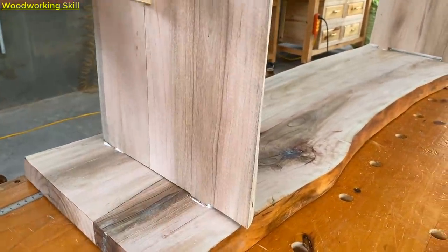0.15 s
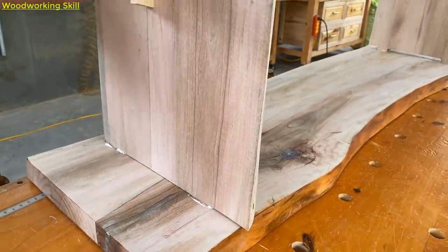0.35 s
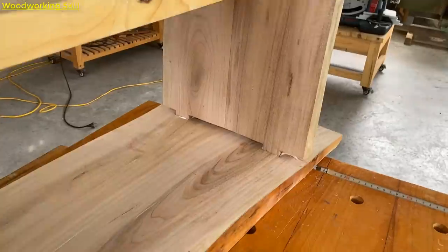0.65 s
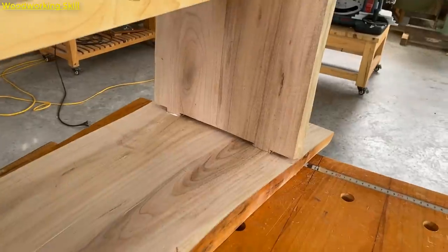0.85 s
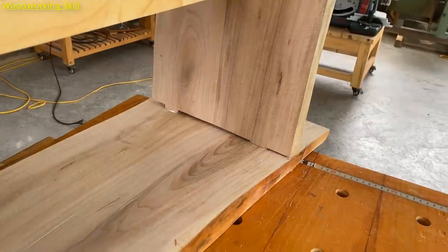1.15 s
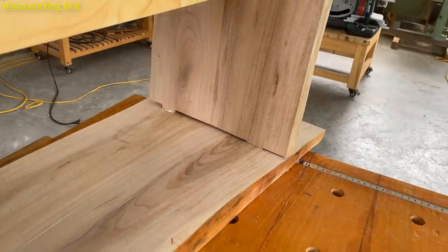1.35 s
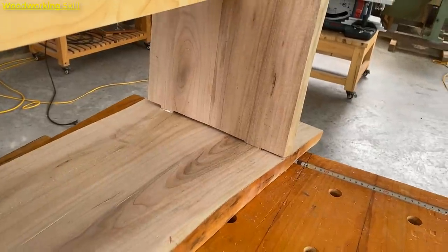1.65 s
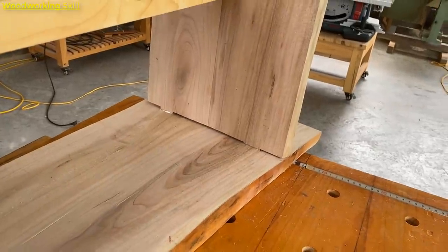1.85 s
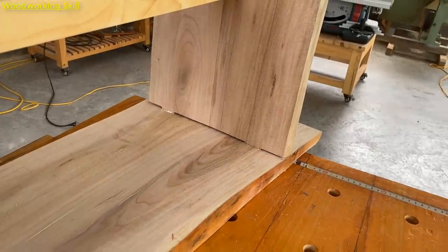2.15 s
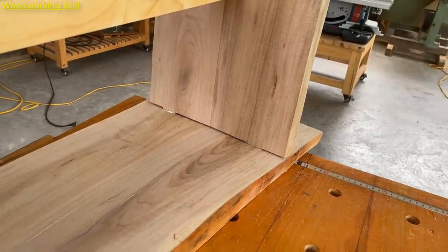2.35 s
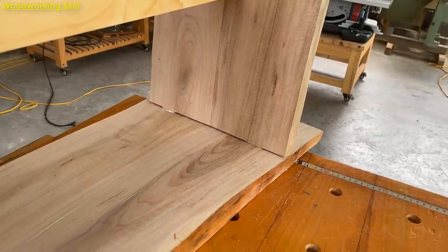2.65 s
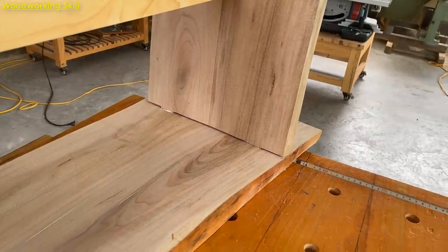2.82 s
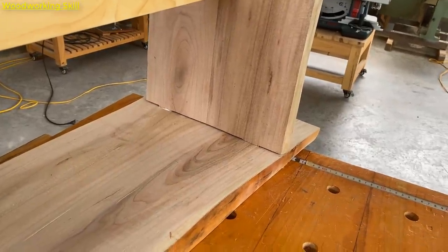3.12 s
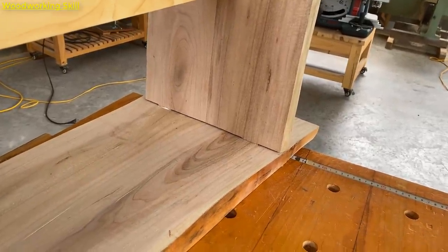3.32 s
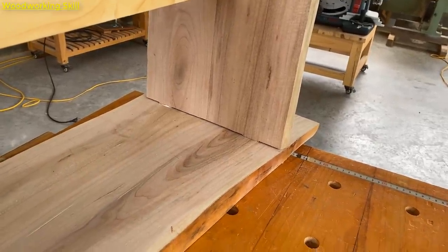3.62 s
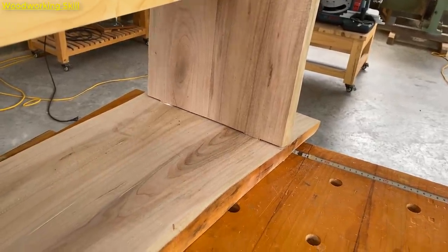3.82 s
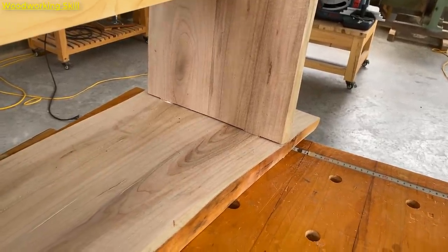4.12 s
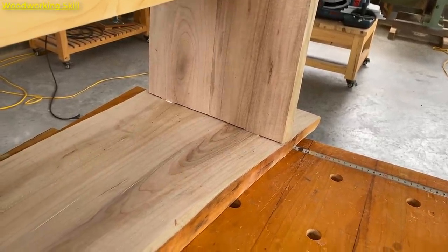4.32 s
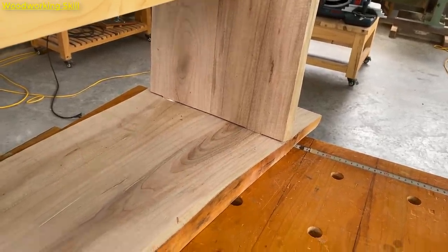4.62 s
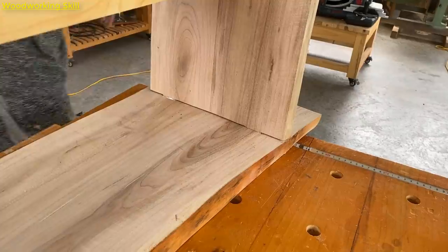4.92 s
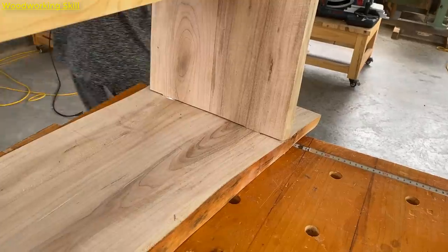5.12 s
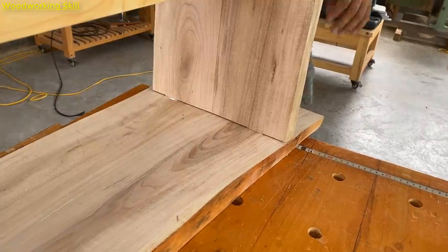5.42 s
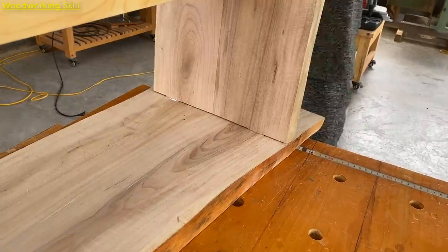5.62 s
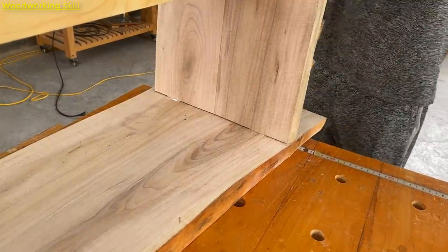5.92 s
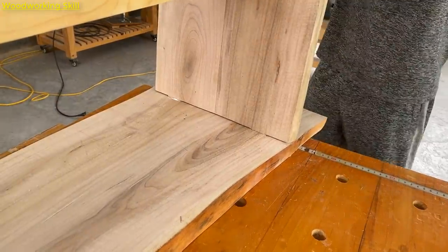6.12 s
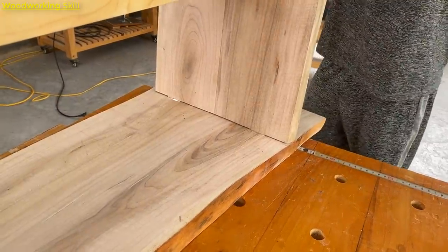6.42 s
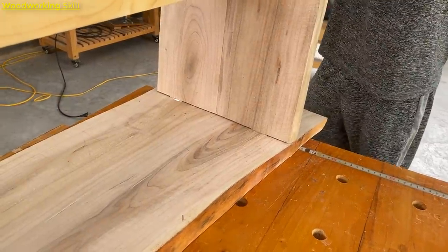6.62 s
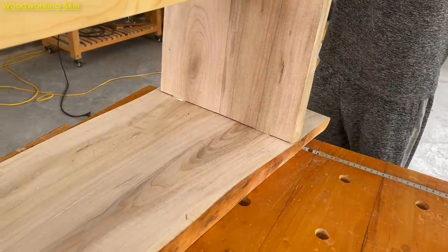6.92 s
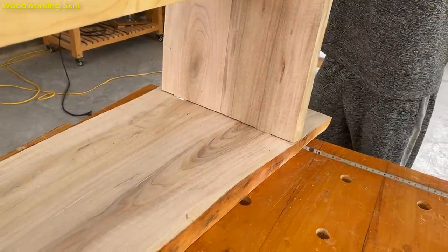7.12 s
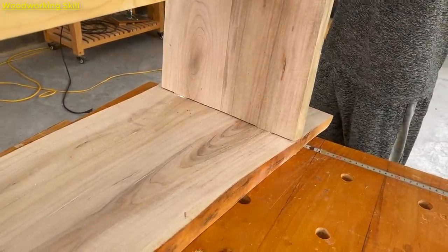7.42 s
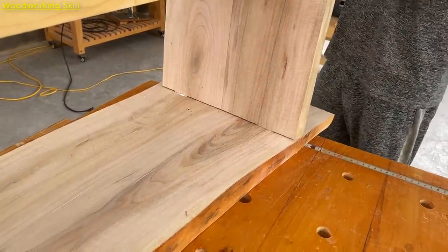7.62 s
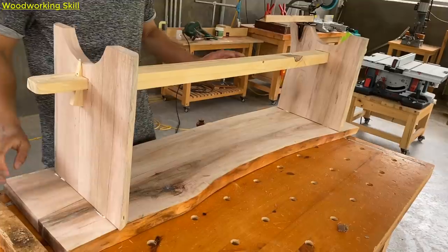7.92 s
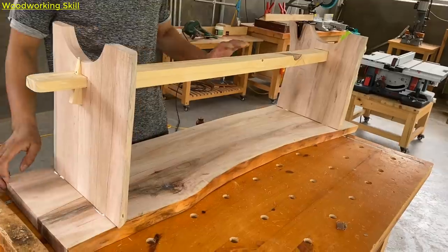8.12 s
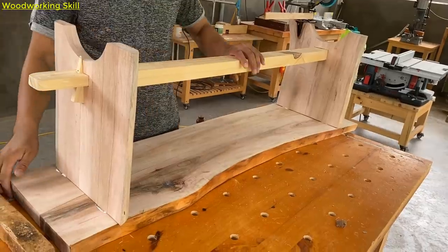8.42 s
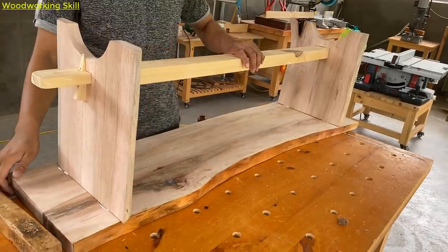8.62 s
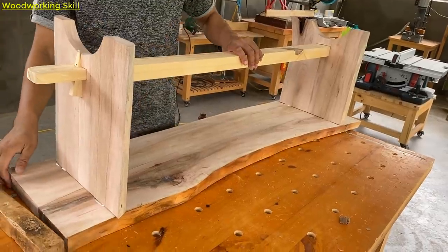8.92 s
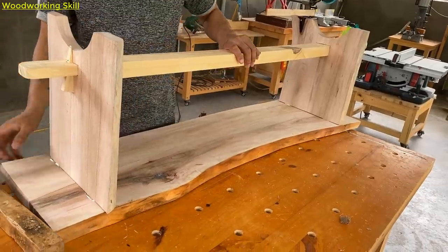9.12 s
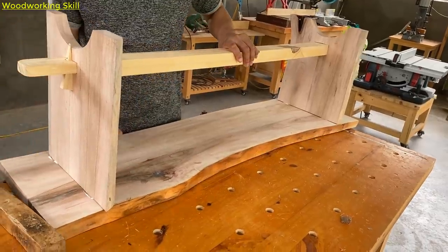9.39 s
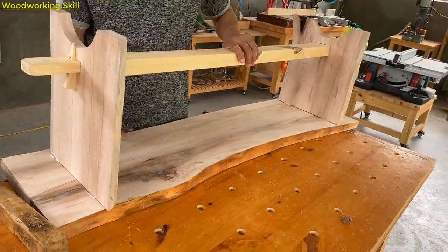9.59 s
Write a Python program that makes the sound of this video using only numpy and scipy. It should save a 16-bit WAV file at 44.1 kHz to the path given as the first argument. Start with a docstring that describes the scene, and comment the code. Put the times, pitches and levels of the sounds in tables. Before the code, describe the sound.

Sharp hammer strikes on thick wooden planks, about four a second, ring briefly in a hard room, pause, resume louder, then stop abruptly.

```python
"""Hammering wooden joints home

A steel hammer strikes wood in runs of quick blows in a bare workshop, close to a stereo microphone.
Each blow is a filtered noise crack plus decaying modes of wood and steel, sent through a noise-built room.
Faint bumps, swishes and room hum lie beneath; a limiter ducks the hard blows and recovers.
Sound drops out twice; after the second gap only a second hum and a few faint bumps are left."""
import sys
import numpy as np
from scipy import signal
from scipy.io import wavfile
from scipy.ndimage import uniform_filter1d, minimum_filter1d

SR = 44100
rng = np.random.default_rng(int(sys.argv[2]) if len(sys.argv) > 2 else 0)


def wav_record(signal):
    """Record a signal, one row per channel, as 16-bit PCM in the file named by sys.argv[1]."""
    frames = np.transpose(np.atleast_2d(signal))
    bounded = np.clip(frames, -1, 1)
    # unit amplitude maps onto the largest positive 16-bit level
    quanta = np.round(bounded * 32767).astype(np.int16)
    wavfile.write(sys.argv[1], SR, quanta)


N = 429973
LEAD_S = .2  # the mix starts this early, for a blow already ringing at t = 0
BLOW_LEN = 12288  # samples, also for bumps

# hammer blows: t/s, strength/dB, then relative to strength: thud/dB (plank and bench), panel ring/dB,
# crack/dB, hammer head ring/dB
BLOWS = [(-0.09, -18, -25, 3, 7.5, 1), (0.093, -15.5, -1.5, 1.5, 8.5, -2),
         (0.3483, -23.5, -10, 5, 13.5, 16.5), (0.6601, -26.5, -5.5, -5, -9.5, -10),
         (0.9, -16, -7.5, 8.5, 10, 6.5), (1.1208, -14.5, -5, 4, 4, -8.5), (1.3422, -14.5, -2, 5, 3.5, -4.5),
         (1.691, -14, -9.5, 0, 1, -8), (1.9214, -15, -3, 7, 7.5, 1), (2.1515, -16.5, -2.5, 6.5, 5.5, -1.5),
         (2.3582, -14.5, 0.5, 5, 2.5, 2.5), (2.5703, -15, -5.5, 6.7, 0.5, -8),
         (2.9328, -33.5, 0.5, 2.5, -6, -7.5), (3.1544, -14, -7, 3.5, 1.3, -2.5),
         (3.392, -13.5, -7.5, 3, 0.5, -0.5), (3.6227, -14.5, -5, 1, 1.6, 1.2),
         (3.984, -32.5, -7.5, -3, -11.5, -7), (4.2329, -15.5, -5, 8, 8, 6.5), (4.4414, -18, -6, 0.6, 11, 4),
         (5.9078, -28.5, -9, -4, -28.5, -13.5), (6.1423, -12.5, -6, -3, 6, -6.5),
         (6.349, -9.5, -8, -0.5, 3, 4), (6.5555, -14, -8.5, 3.6, -4, -19.5),
         (6.7575, -14.5, -10.5, 1, -1.3, -9), (7.01, -23, -13.5, 9, -5, -9.5),
         (7.2378, -15, -6.5, -1, 6.5, -1.5), (7.4695, -17, -8.5, 4.5, 4, -5),
         (7.7955, -27, -17, 6, -12, -8)]
# modes of bench, board, plank, panel and hammer head: f/Hz, level/dB, t60/s
BENCH_MODES = [(101, -21, 0.3), (135, -14.5, .03), (165, -7, 0.011)]
BOARD_MODES = [(357, -3.5, 0.0097), (421, -3, 0.075), (422, 6, .033), (533.6, 1.5, 0.035),
               (635, 0.5, 0.017), (718, 0, 0.015), (822, 7, 0.012), (890, 1.5, 0.016), (936, 7.5, 0.033),
               (1134, 4, 0.0087), (1126, 1, 0.011), (1249, -4.5, 0.014), (1271.4, 3.5, 0.044),
               (1429, -1, 0.036)]
PLANK_MODES = [(198, -9.5, .34), (215, -4, .04), (224, -11, .17), (258, -6, .09), (284, -6.5, .15)]
PANEL_MODES = [(1696, -7, 0.0054), (1952, 5.5, 0.034), (2124, -1, 0.038), (2261, -2.5, 0.0047)]
HEAD_MODES = [(4676, -10.5, 0.025), (4202, -13.5, 0.016), (4325, -3, 0.045), (4735, -13.5, 0.037),
              (4880, -12.5, 0.011)]
# crack spectrum: f/Hz, level/dB
CRACK_COLOUR = [(1500, -27.5), (2600, -1.5), (3200, 4), (3800, 1), (4400, -7.5), (5300, -3), (6900, -8),
                (7600, -3.5), (9000, -11.5), (12000, -16), (16000, -24)]
# soft bumps and rings, some of them a blow's lingering boom or rebound: t/s, level/dB, f/Hz, t60/s
BUMPS = [(.005, -41.5, 506, 0.13), (0.095, -10, 135, 0.076), (0.121, -22.5, 94, .2),
         (.125, -44.5, 506, 0.2493), (.252, -35, 504, .025), (0.255, -33, 195, .05),
         (0.418, -35.5, 116, 0.086), (0.469, -55.5, 107, 0.29), (2.80, -43, 177, 0.076),
         (2.845, -43, 111, 0.19), (2.881, -44, 107.6, .07), (5.618, -44, 150, 0.032),
         (5.689, -53.5, 109, .1), (5.722, -52.5, 171, 0.057), (5.80, -56.5, 107, 0.122),
         (5.881, -45, 168, .05), (6.05, -49.5, 148.4, 0.044), (6.482, -33, 481, .03),
         (6.486, -35.5, 229, .05), (7.982, -69.5, 4900, 0.065), (8.09, -57.5, 1175, 0.28),
         (9.527, -39, 815, 0.035), (9.527, -47.5, 150, 0.4)]
# faint swishes falling in pitch: t/s, length/s, level/dB, start f/Hz, end f/Hz
SWISHES = [(4.727, 0.025, -78, 9000, 6000), (5.421, 0.036, -74, 10000, 8000),
           (5.803, 0.069, -68.5, 9800, 7000)]
# room tail decay: f/Hz, t60/s
ROOM_T60 = [(90, 0.47), (170, 0.16), (260, 0.44), (700, 0.32), (1840, 0.36), (4850, 0.35), (12800, 0.29)]
# room tail spectrum: f/Hz, level/dB
ROOM_COLOUR = [(150, -9), (270, -2.5), (420, -12), (800, -3.5), (1300, -3), (1680, -5.8), (1950, -1),
               (2700, -3.5), (3600, -2.5), (4450, -1), (6000, -11.5), (9000, -7), (16000, 3.5)]
# room tail left-right likeness: f/Hz, correlation (-1..1)
ROOM_ALIKE = [(200, 1), (500, .85), (1000, 0.65), (2400, 0.48), (15000, .05)]
# early echoes from bench, floor and walls: delay/s, level/dB
ECHOES = [(.0035, -13), (.006, -21), (.009, -17), (0.012, -23.5), (0.023, -25), (0.033, -29)]
# hum spectra at the bench and at the second spot: f/Hz, relative level/dB
HUM_COLOUR = [(15, -64), (25, -40.5), (114, -15.5), (259, -9), (368, -6.5), (399, -11.5), (1010, -11.5),
              (1390, -6), (1640, -12), (2040, -9.5), (4240, -19.5), (6210, -25.5), (12200, -32.5),
              (16500, -48.5)]
HUM_AFTER_COLOUR = [(15, -43), (25, 0), (48, -9.5), (192, -5), (304, -6), (399, -4.5), (766, -4.5),
                    (1360, -11.5), (1680, -12), (2750, -18), (3410, -26.5), (6550, -32), (7710, -37.5),
                    (16500, -45)]
# hum left-right likeness at either spot: f/Hz, correlation (-1..1)
HUM_ALIKE = [(60, 0.78), (180, 0.886), (550, 0.35), (1650, -0.76), (4970, -0.62), (15000, -0.69)]
HUM_AFTER_ALIKE = [(60, 0.94), (180, 0.86), (550, 0.13), (1650, -0.16), (4970, 0.15), (15000, -0.036)]
# silences: from t/s, to t/s
GAPS = [(.614, .636), (7.914, 7.960)]

RIGHT_LAG_S, STEEL_LAG_S = .00009, .00018  # right channel delay: wood, crack and hammer head
BODY_LEAN_DB, PANEL_LEAN_DB, STEEL_LEAN_DB = -2.16, 2, 2  # left over right
CRACK_DB, CRACK_T60_S, CRACK_RISE_S = 10.5, .0059, .00067
BOOM_DB, BOOM_DB_PER_THUD_DB = -1, .8  # the bench booms in step with the plank's thud
RING_TO_ROOM_DB = -3.5  # board, panel and head ringing reach the room weaker than the microphone
KNOCK_DB, KNOCK_LOW_HZ, KNOCK_HIGH_HZ = 39, 420, 2590
KNOCK_DB_PER_CRACK_DB = .3  # sharper blows throw out more knock
ROOM_TAIL_DB, ROOM_BUILD_S = -7, .016
LOW_CUT_HZ, EDGE_HZ = 88, 16600  # microphone low cut, output lowpass
HUM_DB, HUM_AFTER_DB, HUM_SWELL_DB_PER_S = -59, -57, 1.27
LIMIT_DB, HOLD_S, DUCK_LAG_S = -4.7, .062, .0013
QUICK_RELEASE_DB_PER_S, SLOW_RELEASE_DB_PER_S = 260, 35


def gain_of(db):
    """Decibels to a factor."""
    return 10 ** (np.asarray(db) / 20)


def evened(x):
    """Scales to rms 1."""
    return x / np.sqrt(np.mean(x ** 2) + 1e-20)


def read(points, hz):
    """Reads a spectrum table on a log-frequency axis."""
    f, value = np.transpose(points)
    return np.interp(np.log(hz + 1), np.log(f + 1), value)


def add(mix, s, sound):
    """Mixes a sound in at time s, cut at the end of the mix."""
    part = mix[..., round((s + LEAD_S) * SR):][..., :sound.shape[-1]]
    part += sound[..., :part.shape[-1]]


def lean(db):
    """Left and right gains for a left-over-right level."""
    return gain_of(db * np.array([[.5], [-.5]]))


def pair(frames, size, alike):
    """Random short-time spectra for two channels, correlated per frequency as the table says."""
    hz = np.fft.rfftfreq(size, 1 / SR)
    a, b, c, d = rng.standard_normal((frames, len(hz), 4)).T
    left, other = a + 1j * b, c + 1j * d
    same = np.clip(read(alike, hz), -1, 1)[:, None]
    return hz, np.array([left, same * left + np.sqrt(1 - same ** 2) * other])


def ring(modes, t, travel=0.05182, spread_db=2.5, detune=0.0033, scatter=0.41, front_db=9.0, front_s=0.0026):
    """Dying modes; bending waves carry treble faster, so a mode arrives travel / sqrt(Hz) seconds late."""
    hz, db, t60 = np.transpose(modes)[:, :, None, None]
    chance = rng.standard_normal((3, len(modes), 1, 1))  # level, pitch, phase
    since = np.maximum(t - travel / np.sqrt(hz), 0)
    rise = 1 - np.exp(-since * hz * 2.02)
    # the first wave front is louder than the ringing left once it has spread through the wood
    front = front_db * (np.exp(-(since / front_s) ** 2) - .5)
    level = gain_of(db + front + spread_db * chance[0] - 60 * since / t60) * rise
    phase = 2 * np.pi * hz * (1 + detune * chance[1]) * since + scatter * chance[2]
    return (level * np.sin(phase)).sum(0)


def crack(since):
    """Steel on wood: coloured noise, partly common to both channels, with a fast and a faint slow decay."""
    lag, margin = round(STEEL_LAG_S * SR), 32
    noise = rng.standard_normal((3, BLOW_LEN + margin))
    shared = np.array([noise[2, margin:], noise[2, margin - lag:][:BLOW_LEN]])
    snap = (noise[:2, margin:] + 1.2 * shared) * np.minimum(since / CRACK_RISE_S, 1)
    snap *= gain_of(-60 * since / CRACK_T60_S) + gain_of(-20 - 60 * since / 0.12)
    grid = np.linspace(0, 1, 257)
    colour = signal.firwin2(255, grid, gain_of(read(CRACK_COLOUR, grid * SR / 2)))
    return gain_of(CRACK_DB) * signal.oaconvolve(snap, colour[None], "same")


def knock(crack_db):
    """Broad knock that all faces of the work throw out together: a band-passed impulse."""
    band = signal.butter(3, (KNOCK_LOW_HZ, KNOCK_HIGH_HZ), "band", fs=SR, output="sos")
    pulse = signal.sosfilt(band, signal.unit_impulse(BLOW_LEN, idx=44))
    return gain_of(KNOCK_DB + KNOCK_DB_PER_CRACK_DB * crack_db) * pulse


def blow(strength_db, thud_db, panel_db, crack_db, head_db):
    """Crack, then bench, plank, board, panel and hammer head ring: (at the microphone, into the room)."""
    t = np.arange(BLOW_LEN) / SR - np.array([[0], [RIGHT_LAG_S]])
    # the hammer lands up and to the left
    steel_t = np.arange(BLOW_LEN) / SR - np.array([[0], [STEEL_LAG_S]])

    snap = gain_of(crack_db) * crack(np.maximum(steel_t, 0))
    boom_db = BOOM_DB + BOOM_DB_PER_THUD_DB * thud_db
    thud = gain_of(boom_db) * ring(BENCH_MODES, t, travel=0.043, front_db=6.5, front_s=0.0088)
    thud += gain_of(thud_db) * ring(PLANK_MODES, t, travel=.06, front_db=10.0, front_s=0.021)
    strike = lean(BODY_LEAN_DB) * thud + lean(STEEL_LEAN_DB) * snap

    board = -ring(BOARD_MODES, t, detune=0.021)
    panel = gain_of(panel_db) * ring(PANEL_MODES, t, front_db=5.0, front_s=0.0027, detune=0.0028)
    head = gain_of(head_db) * ring(HEAD_MODES, steel_t, scatter=3.3, detune=0.007)
    rings = lean(BODY_LEAN_DB) * board + lean(PANEL_LEAN_DB) * panel + lean(STEEL_LEAN_DB) * head

    to_room = strike + gain_of(RING_TO_ROOM_DB) * rings + knock(crack_db)
    return gain_of(strength_db) * np.array([strike + rings, to_room])


def room(x):
    """A few early echoes and a dense tail whose bands die at their own speed."""
    frames, hop = 240, 128
    hz, z = pair(frames, 512, ROOM_ALIKE)
    t = np.arange(frames) * hop / SR
    decay_db = -60 * t / read(ROOM_T60, hz)[:, None]
    z = z * gain_of(read(ROOM_COLOUR, hz)[:, None] + decay_db)
    tail = signal.istft(z, nperseg=512, noverlap=512 - hop)[1]
    tail *= np.minimum(np.arange(tail.shape[1]) / SR / ROOM_BUILD_S, 1)
    tail *= gain_of(ROOM_TAIL_DB) / np.linalg.norm(tail[0])
    for s, db in ECHOES:
        tail[[0, 1], round(s * SR) + rng.integers(0, 6, 2)] += gain_of(db)
    return signal.fftconvolve(x, tail, axes=1)[:, :x.shape[1]]


def hum(colour, alike, patchy_db=0.7):
    """Steady room noise, coloured per frequency, with faint drifting patches; rms 1."""
    hz, z = pair(N // 512 + 5, 2048, alike)
    patches = uniform_filter1d(rng.standard_normal(z.shape[1:]), 20, 0)
    patches = evened(uniform_filter1d(patches, 8, 1))
    z = z * gain_of(read(colour, hz)[:, None] + patchy_db * patches)
    return evened(signal.istft(z, nperseg=2048, noverlap=1536)[1][:, :N])


def bump(db, hz, t60):
    """A soft bump or ring: one mode with two weak neighbours, same in both channels."""
    t = np.arange(BLOW_LEN)[None] / SR
    modes = [(hz, db, t60), (1.4 * hz, db - 10, t60 / 2), (.75 * hz, db - 12, t60 / 2)]
    return ring(modes, t, travel=0, front_db=1.5) * np.ones((2, 1))


def swish(length_s, db, start_hz, end_hz):
    """A band of hiss that slides down: smoothed noise on a falling carrier."""
    count = round(length_s * SR)
    carrier = np.exp(2j * np.pi * np.cumsum(np.linspace(start_hz, end_hz, count)) / SR)
    noise = uniform_filter1d(rng.standard_normal((2, 2, count)), size=24)
    hiss = evened(((noise[0] + 1j * noise[1]) * carrier).real)
    return gain_of(db) * hiss * signal.windows.tukey(count, .5)


def scene():
    """Blows and small sounds in the room, over its hum, with two silent gaps."""
    # blows take turns through four differently drawn room tails
    # axes: tail, (microphone, room), channel, sample
    near = np.zeros((4, 2, 2, N + round(LEAD_S * SR)))
    for k, (s, *row) in enumerate(BLOWS):
        add(near[k % len(near)], s, blow(*row))
    for s, *row in BUMPS:
        add(near[0], s, bump(*row))
    for s, *row in SWISHES:
        add(near[0], s, swish(*row))
    # low cut at the microphone thins the deep bass
    near = signal.sosfilt(signal.butter(4, LOW_CUT_HZ, "high", fs=SR, output="sos"), near)

    t = np.arange(N) / SR
    after_s = t - GAPS[1][0]
    hum_before = gain_of(HUM_DB) * hum(HUM_COLOUR, HUM_ALIKE)
    swell = gain_of(HUM_AFTER_DB + HUM_SWELL_DB_PER_S * after_s)
    hum_after = swell * hum(HUM_AFTER_COLOUR, HUM_AFTER_ALIKE)
    floor = np.where(after_s > 0, hum_after, hum_before)

    # nothing struck before the second gap rings on after it
    cut = round((GAPS[1][0] + LEAD_S) * SR)
    before = sum(direct + room(to_room) for direct, to_room in near[..., :cut])
    rest = near[0, 0, :, cut:]
    heard = np.hstack([before, rest + room(rest)])[:, -N:]

    sounding = np.prod([(t < a) | (t > b) for a, b in GAPS], axis=0)
    return (heard + floor) * uniform_filter1d(sounding * 1., size=40)


def record(dry):
    """The first cycles of a hard blow clip; a limiter then ducks, creeps up and lets go after a hold."""
    over_db = np.maximum(20 * np.log10(abs(dry).max(0) + 1e-9) - LIMIT_DB, 0)
    hold = round(HOLD_S * SR)
    held_db = -minimum_filter1d(-over_db, size=hold + 1 - hold % 2, origin=hold // 2)
    t = np.arange(N) / SR
    quick_db, slow_db = t * QUICK_RELEASE_DB_PER_S, t * SLOW_RELEASE_DB_PER_S
    let_go_db = np.maximum.accumulate(held_db + quick_db) - quick_db
    creep_db = np.maximum.accumulate(over_db + slow_db) - slow_db
    lag = np.exp(-1 / (DUCK_LAG_S * SR))
    duck_db = signal.lfilter([1 - lag], [1, -lag], np.minimum(let_go_db, creep_db))
    driven = dry / gain_of(duck_db) / 0.72
    limited = .62 * driven / (1 + driven ** 6) ** (1 / 6)  # soft clip
    lowpass = signal.firwin(255, EDGE_HZ, window=("kaiser", 9), fs=SR)
    return signal.oaconvolve(limited, lowpass[None], "same")


dry = scene()
out = record(dry)
wav_record(out)
```